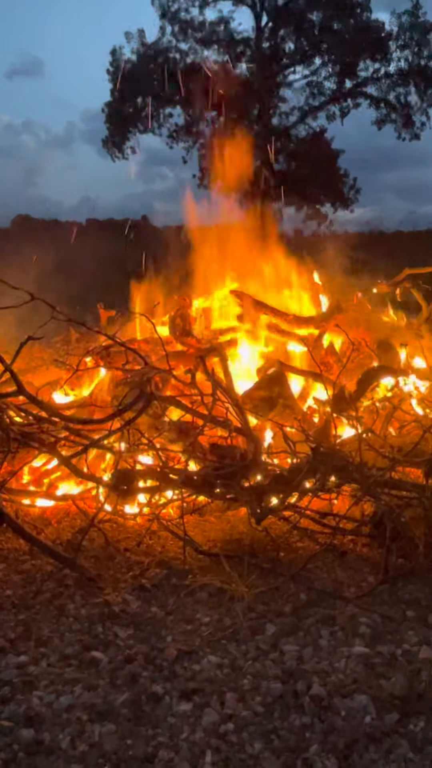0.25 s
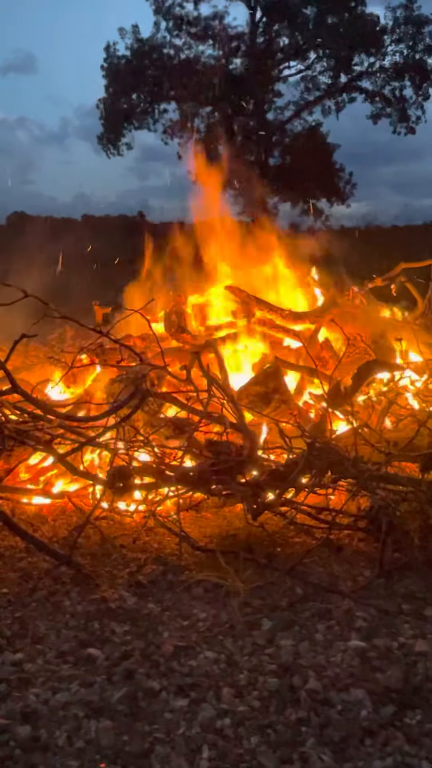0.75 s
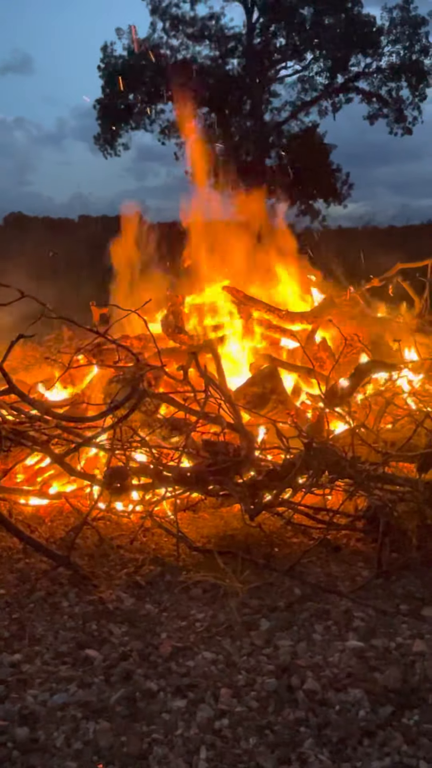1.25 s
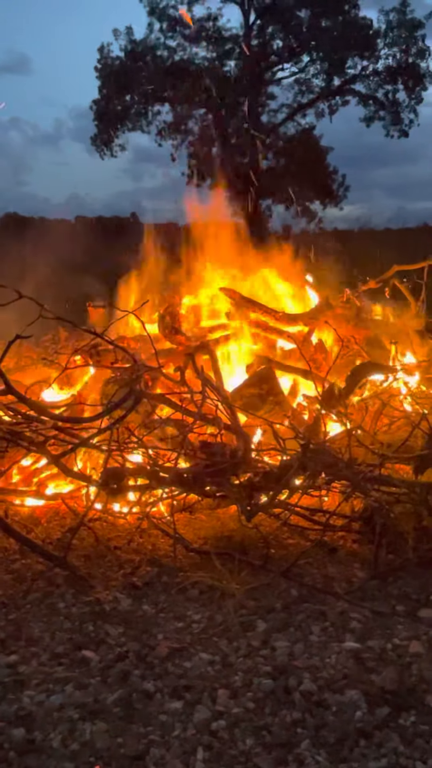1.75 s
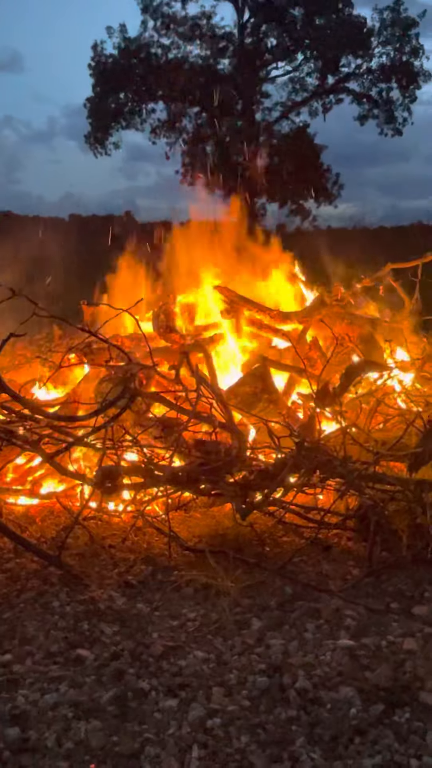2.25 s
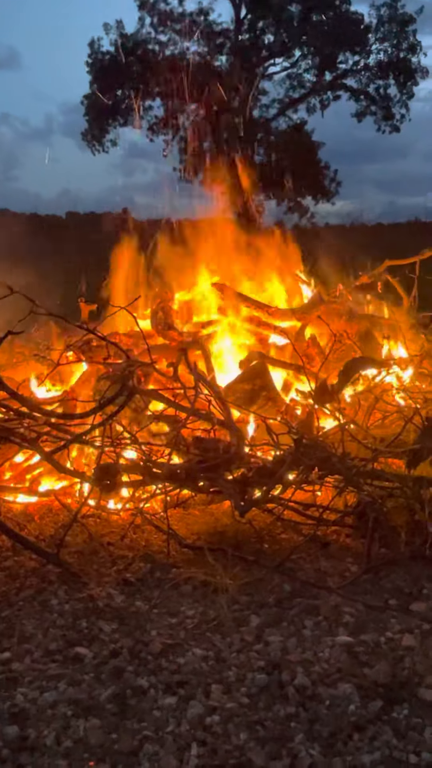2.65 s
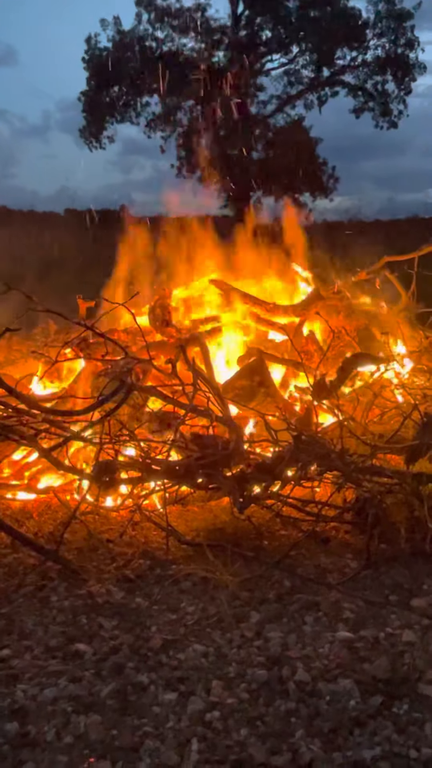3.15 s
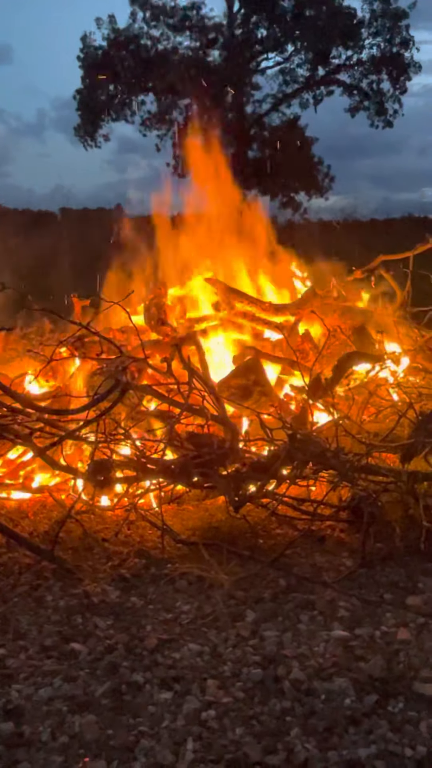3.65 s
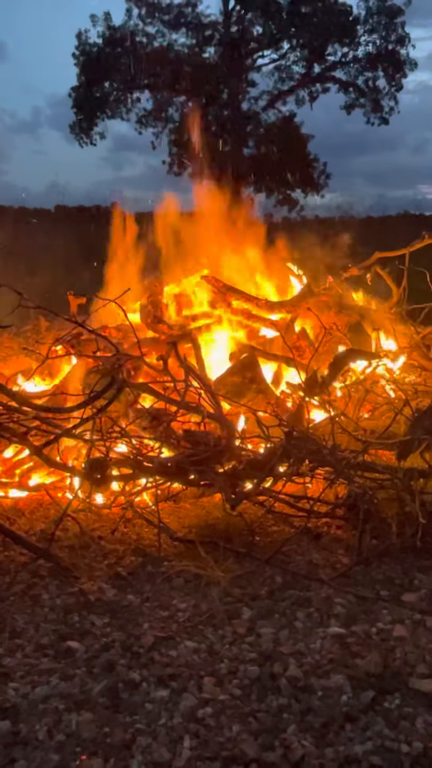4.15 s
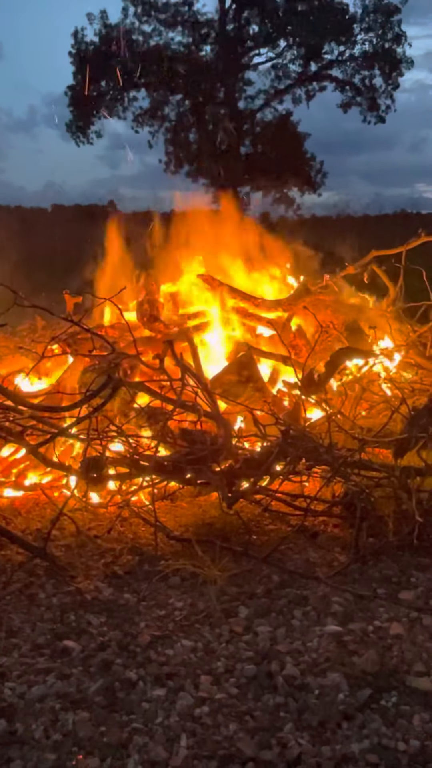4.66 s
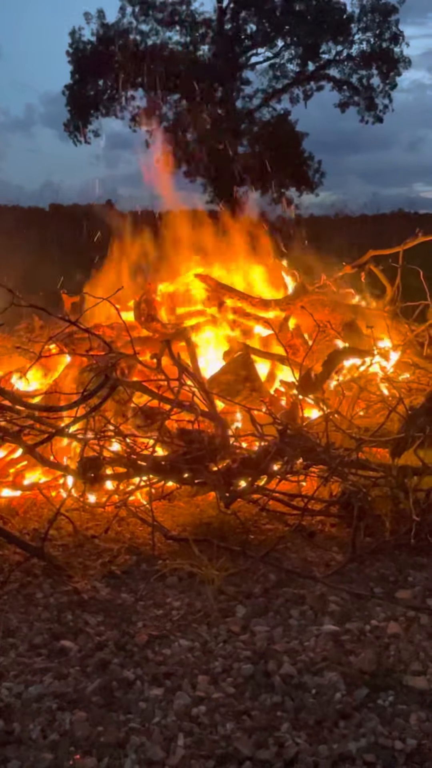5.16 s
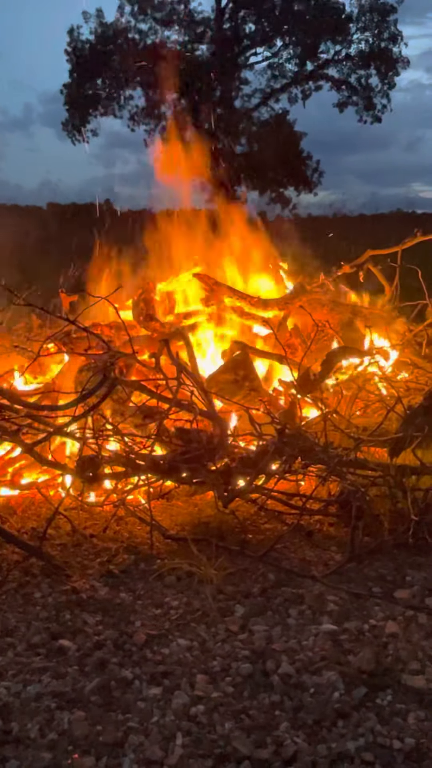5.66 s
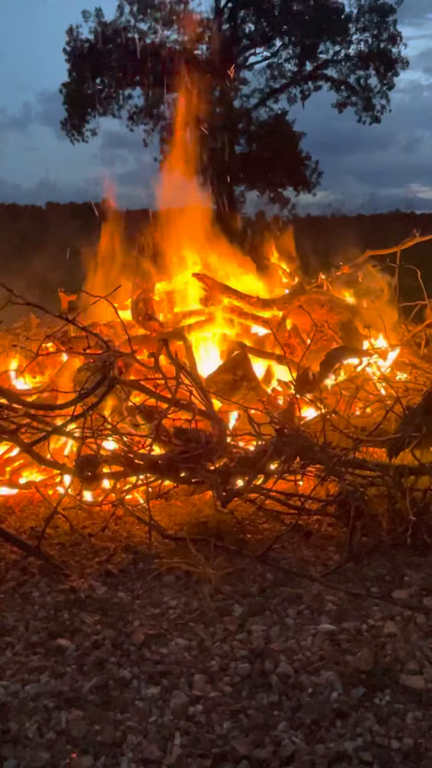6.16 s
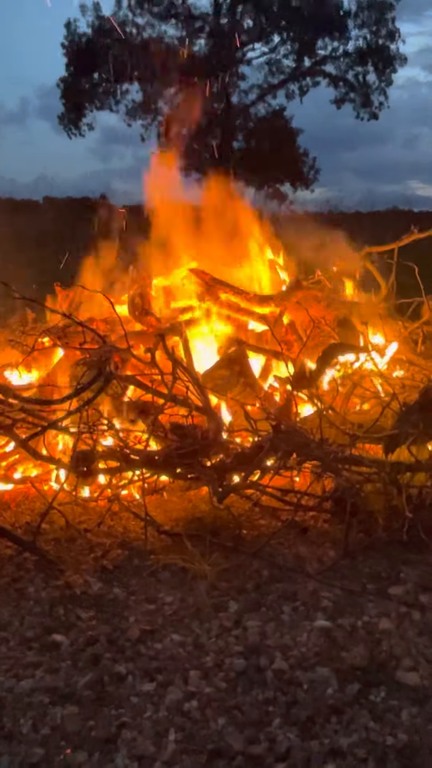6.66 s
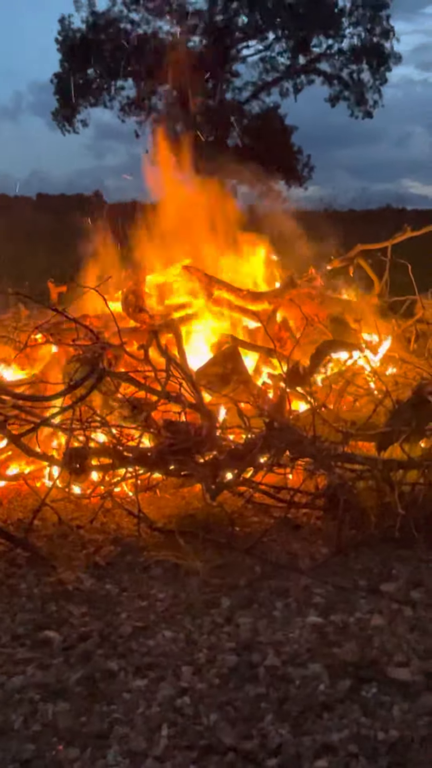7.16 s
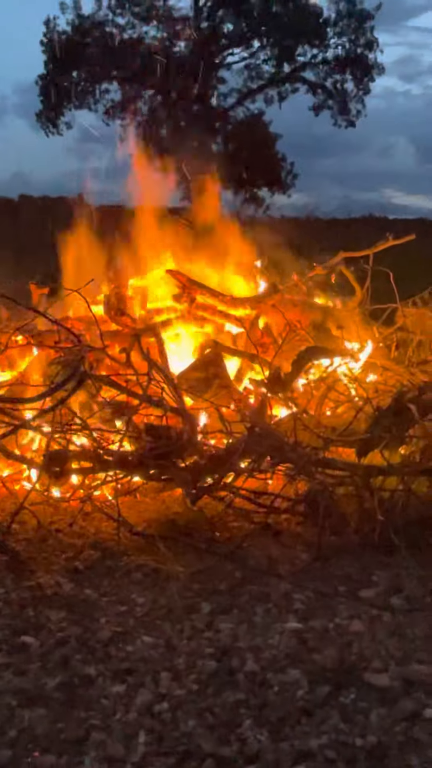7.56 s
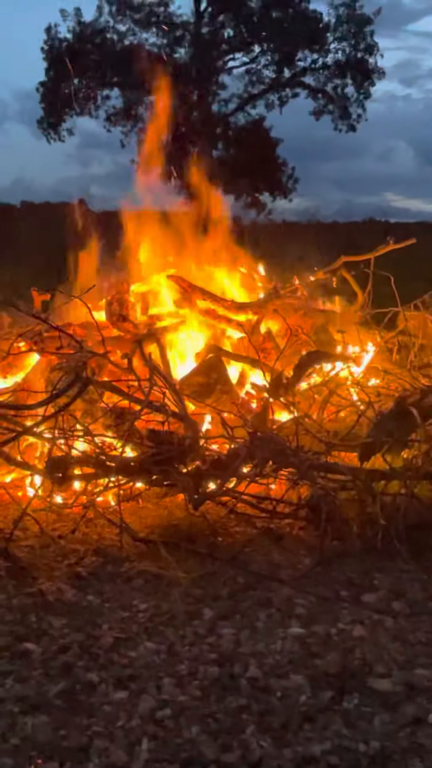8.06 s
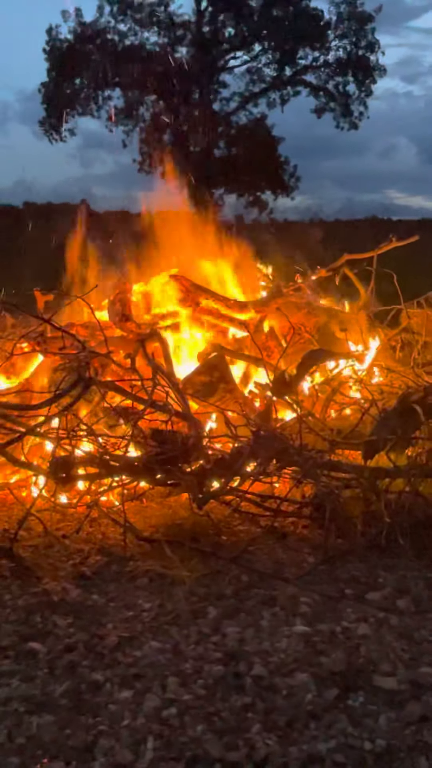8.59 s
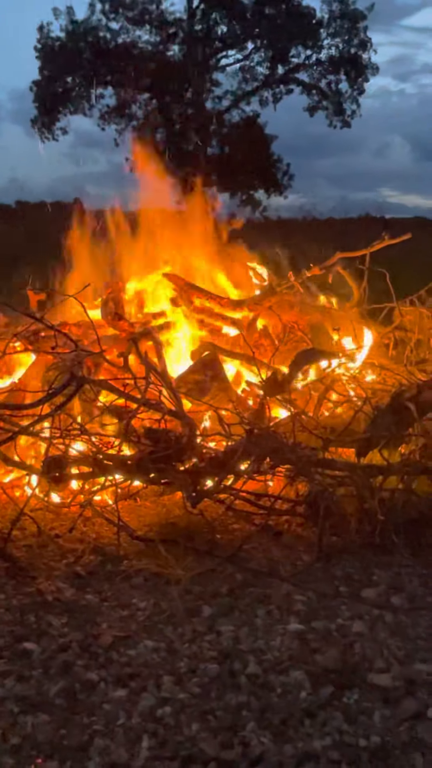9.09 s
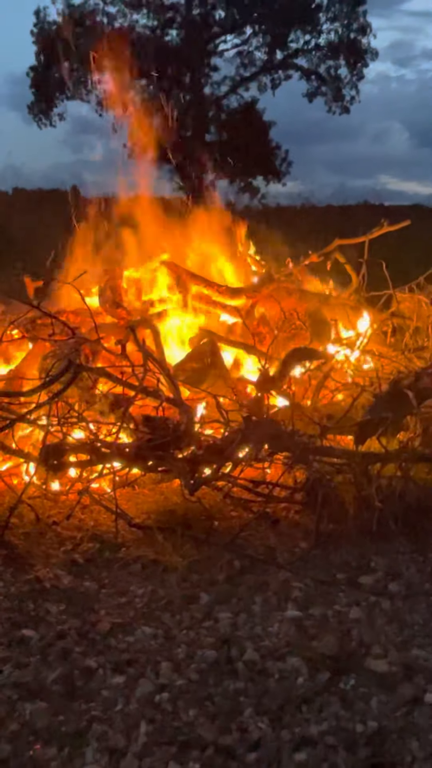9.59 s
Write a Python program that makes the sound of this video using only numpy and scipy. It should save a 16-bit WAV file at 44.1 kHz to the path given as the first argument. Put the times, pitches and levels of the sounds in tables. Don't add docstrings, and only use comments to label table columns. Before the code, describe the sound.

A large fire of logs and dry branches burns outdoors, heard close in stereo with a dry, open sound. A deep, soft flame roar runs throughout, with thin fluttering sizzle above it. From 0 to 2 s, small ticks and snaps scatter irregularly, with a clearer pop at 0.2. Around 2.1 to 2.6 s several pops cluster; the hiss flares near 2.9 while a cow lows very faintly far away, from 2.6 to 3.3. Pops at 3.2 and 4.3 lead into light crackle and a sparser stretch. At 6.2 s comes the loudest, sharp crack, then bright snaps near 6.9. Activity thickens from 8 s: a hard crack at 8.2, strong pops at 8.7, dull knocks around 9.2 and another sharp pop at 9.4, as the roar swells toward the end. Crickets trill faintly throughout, with intermittent three-pulse chirps about every half second between 1.7 and 6.5 s.

```python
import sys
import numpy as np
from scipy import signal
from scipy.fft import rfft, irfft, next_fast_len
from scipy.io import wavfile
from scipy.ndimage import uniform_filter1d

SR = 44100
rng = np.random.default_rng(int(sys.argv[2]) if len(sys.argv) > 2 else 0)


def store_pcm(level_fs):
    pcm = np.round(np.clip(level_fs, -1, 1) * 32767).astype(np.int16)
    wavfile.write(sys.argv[1], SR, np.atleast_2d(pcm).T)


def makeup_ratio(level_db):
    decades = np.asarray(level_db, float) / 20
    return 10 ** decades


N = 433503


def level(x, db):
    return x * makeup_ratio(db) / np.sqrt(np.mean(x ** 2))


def curve(table):
    s, *columns = np.transpose(table)
    return [np.interp(np.arange(N) / SR, s, column) for column in columns]


def colour(x, shape):
    hz, db = np.transpose(shape)
    size = next_fast_len(x.shape[-1])
    f = np.maximum(np.fft.rfftfreq(size, 1 / SR), 1)
    gain = makeup_ratio(np.interp(np.log(f), np.log(hz), db))
    return irfft(rfft(x, size) * gain, size)[..., :x.shape[-1]]


def walk(rate):
    hold = int(SR / rate)
    steps = np.repeat(rng.standard_normal(N // hold + 1), hold)
    return 1.19 * uniform_filter1d(uniform_filter1d(steps, hold), hold)[:N]


# frequency in Hz, lead in radians.
PORT_LEAD = [(20, 0), (3300, 0), (4500, 3.0), (5100, 1.0), (7700, 3.14), (11000, 6.28), (14400, 9.42),
             (15500, 10.3), (22050, 10.5)]


def ports(main, other, lo_hz, hi_hz, unlike):
    size = next_fast_len(N)
    f = np.fft.rfftfreq(size, 1 / SR)
    octaves_off = np.log(np.maximum(f, 1) ** 2 / (lo_hz * hi_hz)) / np.log(hi_hz / lo_hz)
    share = np.clip(unlike, 0, 1) * np.exp(-np.abs(octaves_off) ** 4)
    share = np.minimum(share + f / 3e5, 1)
    left, odd = rfft(main[0], size), rfft(other, size)
    right = rfft(main[1], size) * np.sqrt(1 - share) + odd * np.sqrt(share)
    turn = np.exp(.5j * np.interp(f, *np.transpose(PORT_LEAD)))
    return irfft(np.array([left * turn, right / turn]), size)[:, :N]


BURST_EDGES_HZ = [190, 1300, 4500, 9000, 16000]
# frequency in Hz, gain in dB.
BURST_TREBLE = [(20, 0), (1600, 2.5), (2500, 0), (3400, -4), (4600, 0), (9000, 0), (13000, -6), (15850, 0),
                (16150, -14), (17100, -24), (17300, -80)]


def bursts(rows, blast_s=0.00038, rattle_s=0.0051, rattle_db=-29, thump_s=0.0019, size=1024, count=96):
    s, crack_db, thump_db, snap_db, spit_db, crack_hz = np.transpose(rows)
    t = (np.arange(size) - count) / SR
    after = np.maximum(t, 0)
    chance = rng.standard_normal((len(s), 3, size + 3))
    noise = chance[:, :2, :size]
    pan_db = 1.4 * chance[:, 2, -1]
    vary = np.exp(0.404 * chance[:, :1, -3:])

    edge = .1 * np.exp(-np.abs(t) / (blast_s * vary[..., :1] * np.where(t < 0, .9, 1)))
    echoes = makeup_ratio(1.7 * uniform_filter1d(chance[:, 2:, :size], size=24) * np.sqrt(24))
    rattle = makeup_ratio(rattle_db) * np.exp(-after / rattle_s) * np.minimum(after / 0.0012, 1) * echoes
    blast = noise * (edge + rattle) + .65 * (t == 0)
    ragged = blast + 2.5 * edge * noise

    cycles = 300 * after + 1300 * 0.000963 * (1 - np.exp(-after / 0.00077))
    deep = makeup_ratio(.5 * np.clip(thump_db + 7.5, 0, 18))[:, None, None]
    thump = np.sin(2 * np.pi * cycles * vary[..., 1:2] / np.sqrt(deep))
    thump = thump * np.exp(-after / (thump_s * deep * vary[..., 2:])) + .5 * blast

    f = np.maximum(np.fft.rfftfreq(size, 1 / SR), 1)
    sides = np.array([[.5], [-.5], [-.5]])
    layers = ((thump, thump_db, 3.5), (blast, 0, pan_db), (ragged, snap_db, 0), (ragged, spit_db, 0))
    shapes = 0
    for k, (source, db, pan) in enumerate(layers):
        lo_hz, hi_hz = BURST_EDGES_HZ[k:k + 2]
        band = 1 / np.sqrt((1 + (lo_hz / f) ** 10) * (1 + (f / hi_hz) ** 10))
        if k == 1:
            band = band * (.3 + np.exp(-np.log(f / crack_hz[:, None, None]) ** 2 / .1))
        part = irfft(rfft(source) * band, size)
        energy = np.sum(part[..., :count + 200] ** 2, axis=-1, keepdims=True) / 240
        gain = makeup_ratio(crack_db + db + pan * sides).T[..., None]
        shapes = shapes + (part / np.sqrt(energy))[:, [0, 0, 1]] * gain

    out = np.zeros((3, N + size))
    for start, shape in zip((s * SR).astype(int) + 12, colour(shapes, BURST_TREBLE)):
        out[:, start:start + size] += shape
    out = out[:, count:N + count]
    return ports(out[:2], out[2], 3100, 5200, .45)


def ticks(s, crack_db, treble_db):
    thump, tilt = rng.standard_normal((len(s), 2)).T
    thump_db = -9 + 4 * thump
    snap_db, spit_db = treble_db - 1.5 + 5.6 * tilt, treble_db - 2 - 6.0 * tilt
    return np.transpose([s, crack_db, thump_db, snap_db, spit_db])


# start in seconds, end in seconds.
FLURRY_TIMES = [(.48, .54), (.65, .74), (.85, .89), (1.03, 1.19), (1.53, 1.66), (1.75, 1.78), (1.92, 1.98),
                (2.38, 2.52), (2.63, 2.8), (2.91, 3.08), (3.8, 3.91), (4.19, 4.36), (4.64, 4.66),
                (4.93, 5.12), (5.45, 5.53), (5.71, 5.76), (6.33, 6.44), (6.7, 6.71), (7.0, 7.09),
                (7.34, 7.54), (7.79, 7.88), (8.23, 8.27), (8.34, 8.53), (8.63, 8.71), (8.84, 9.12),
                (9.24, 9.34)]


def crackle(count=150, lull_share=.12):
    t = np.arange(N) / SR
    in_flurry = sum((t > start) & (t < end) for start, end in FLURRY_TIMES)
    busy = np.cumsum(lull_share + in_flurry)
    when, size, bright = rng.random((count, 3)).T
    s = np.interp((np.arange(count) + when) / count, busy / busy[-1], t)
    bright_db = 8.5 + 22 * (bright - .5)
    treble_db = -51.5 - 1.5 * np.log(size + 0.06)
    return ticks(s, treble_db - np.maximum(bright_db, 1), bright_db)


# start in seconds, crack level in dB,
# then thump, snap and spit in dB relative to the crack.
LOG_POPS = [(0.2254, -36.5, -8.5, 4, -21), (2.1581, -38.5, -17, 4.5, -13), (2.2021, -40.5, -7.5, -4, -17),
            (2.4328, -43, 1.5, 2, 5), (3.212, -40, -4.5, 4.5, -12), (4.3363, -34.5, -19, -13, -26),
            (4.8053, -42.5, -12, 11.5, -10), (6.1907, -19.5, -9, -4, -34), (6.3591, -39, 2, -8, -7),
            (7.7741, -42, -16, -1, -15), (7.9908, -32.5, -12.5, -0.5, 10), (8.1939, -23, -3.5, -14, -9),
            (8.2173, -35.5, -7, 4, 14), (8.6828, -32.5, -11.5, 4.5, -2), (8.7339, -27.5, -7, -3, 6),
            (9.3929, -28.5, -10.5, 5.5, -31)]
# start in seconds, crack level in dB,
# then thump, snap and spit in dB relative to the crack.
LIMB_POPS = [
    (0.9337, -36, -18, 4, -32),
    (1.4615, -39, -31, -1, 2.5),
    (2.0707, -40.5, -22, 1, -17),
    (2.0856, -33.5, -23, 5.5, -17),
    (2.2327, -41, -11, 8, -26),
    (2.6214, -33, -15.5, 6.5, -2),
    (6.9469, -44.5, -24, 14.5, 13),
    (9.1849, -40, -14, 3.5, -6),
    (9.5163, -41, -14.5, 3.5, 3.5),
    (9.8097, -42, -14, 2, -29),
]
# start in seconds, crack level in dB,
# then snap and spit in dB relative to the crack.
BRANCH_SNAPS = [(0.0968, -44.5, 7.5, -12), (0.2707, -47.5, 7.5, 8), (0.377, -51, 9.5, -6),
                (0.9674, -43, 5, -13), (1.9568, -51, 4.5, -5), (4.845, -54, 6, 7), (2.3559, -52.5, 12, 9),
                (2.8327, -45.5, 7.5, 2), (3.0166, -58, 22, 17), (4.4234, -48, 0, 0), (4.5988, -51, 9.5, 10),
                (4.7139, -50.5, 10, 15), (4.7265, -50.5, 8, 7), (4.7701, -48.5, 7, -4),
                (5.3539, -47.5, -2, 6), (6.7812, -46, 3, -18), (6.8211, -48, 8, 8), (6.9602, -46, 1, -4),
                (7.3676, -47.5, -6, 5), (7.6212, -53, 6.5, 12), (7.8067, -57, 5, 11),
                (8.1744, -42.5, -4, 9.5), (8.5839, -42.5, 0, 2.5), (8.6644, -42.5, 0, 7),
                (8.7847, -47.5, 5.5, -1), (9.136, -51.5, 9, 7), (9.1556, -47.5, 8.5, 8),
                (9.2302, -54.5, 12, 14), (9.4934, -49, 9, -11), (9.6774, -51.5, 14, 3)]
# start in seconds, crack level in dB,
# thump in dB relative to the crack.
WOOD_THUDS = [
    (0.7454, -47, -4.5),
    (2.3021, -65.5, 19.5),
    (5.597, -60.5, 12),
    (7.1036, -43.5, -10),
    (8.292, -50, 2.5),
    (8.8562, -45, -1.5),
    (9.2154, -39.5, -8),
]
# start in seconds, crack level in dB, treble in dB relative to the crack.
TWIG_KNOCKS = [(0.171, -51, 0), (0.2337, -52, -13), (0.4409, -54.5, 4), (0.964, -60, -12), (1.4556, -48, 5),
               (1.788, -47.5, -5), (2.0179, -45.5, -23), (2.8286, -57, 2), (3.1775, -48, 0),
               (4.3874, -52.5, 4.5), (5.0522, -56, -2), (5.0769, -47.5, -7), (5.376, -51, 1),
               (5.5058, -53, -11), (5.7237, -47.5, 3.5), (6.182, -50, -1), (6.999, -48, -10),
               (7.2138, -51, -18), (7.7038, -51.5, -5), (7.8747, -51, 0.5), (8.064, -50, -17),
               (8.2576, -49.5, -10), (8.4753, -50, 7), (8.7206, -49, -9), (8.8157, -44.5, -10),
               (9.1772, -47, 2), (9.4895, -49.5, 6), (9.5815, -49, 4.5), (9.694, -50.5, -11),
               (9.7467, -42.5, -2.5)]
# start in seconds, crack level in dB, treble in dB relative to the crack.
BARK_SPITS = [(0.488, -53.5, 12.5), (0.6798, -55, 10.5), (1.3018, -59, 13), (1.4649, -58.5, 15),
              (2.2149, -50.5, 5), (2.5706, -69, 23.5), (2.7456, -56, 10), (2.8525, -53, 10),
              (2.9369, -60, 10), (2.993, -63, 15), (3.2543, -54, 8), (4.2673, -60, 11), (5.0373, -52.5, 8),
              (5.1016, -55.5, 8.5), (5.9563, -62.5, 19), (6.276, -54.5, 9), (6.2879, -47.5, 4),
              (6.8148, -51, 7.5), (6.8276, -51, 6), (6.9435, -47.5, 9), (6.9798, -57, 13.5),
              (7.0197, -50, 4), (8.0238, -64, 14), (8.0377, -60.5, 15), (8.2119, -42.5, 2),
              (8.4475, -55.5, 12), (8.7379, -40.5, 11), (8.746, -49, 3), (8.935, -64, 22),
              (9.324, -58, 14.5)]


def pockets():
    snaps = np.insert(BRANCH_SNAPS, 2, -12, axis=1)
    s, crack_db, thump_db = np.transpose(WOOD_THUDS)
    dull_db = np.full(len(s), -5.0)
    thuds = np.transpose([s, crack_db, thump_db, dull_db, dull_db])
    twigs = ticks(*np.transpose(np.vstack([TWIG_KNOCKS, BARK_SPITS])))
    small = np.vstack([snaps, thuds, twigs, crackle()])
    small_hz = 2690 * np.exp(0.33 * rng.standard_normal(len(small)))
    crack_hz = np.r_[[2305] * len(LOG_POPS), [3480] * len(LIMB_POPS), small_hz]
    return np.column_stack([np.vstack([LOG_POPS, LIMB_POPS, small]), crack_hz])


# frequency in Hz, density in dB per Hz.
SIZZLE_COLOUR = [(500, -34), (1200, -6), (2500, 6), (4500, 4), (6000, 3), (9000, -3.5), (10700, 5),
                 (13000, -3.5), (15800, 5), (16150, -50)]


def sizzle(db):
    tail = np.exp(-np.arange(300) / 45)
    sizes = makeup_ratio(np.minimum(5.15 * rng.exponential(size=N), 16))
    grains = (rng.random(N) < 500 / SR) * sizes
    cracks = signal.fftconvolve(grains, tail)[:N]
    swell = np.sqrt(1 + (0.78 * cracks) ** 2) * makeup_ratio(db + walk(17))
    main, other = colour(rng.standard_normal((2, N)) * swell, SIZZLE_COLOUR)
    return ports([main, main], other, 2540, 8100, 1.0)


# frequency in Hz, density in dB per Hz.
ROAR_COLOUR = [(13, -62), (22, -34), (40, -5), (70, 1), (170, -9), (233, -15), (452, -23), (630, -31),
               (861, -33.5), (1050, -35), (1800, -37.5), (2340, -104), (3960, -120)]


def roar(db):
    main, other = colour(rng.standard_normal((2, N)), ROAR_COLOUR)
    gain = makeup_ratio(db + 2 + 0.58 * walk(5.6)) / np.std(main)
    left, right = main + 0.039 * other, main - 0.056 * other
    return ports([left * gain, right * gain], other * gain, 330, 2100, 0.75)


# carrier in Hz, pulses a second, level in dB, left minus right in dB,
# left lead in radians.
TRILL_CHORUS = [
    (2767, 90, -63.5, 0, 0.92),
    (3760, 40, -65, -3, 0.44),
    (4420, 28, -68, 6, 3.3),
    (5500, 39, -70.5, -7, 1.7),
]


def trills(blur_hz=260):
    t, out = np.arange(N) / SR, 0
    side = np.array([[.5], [-.5]])
    smear = signal.butter(2, blur_hz / 2, fs=SR, output="sos")
    for hz, rate, db, pan_db, lead in TRILL_CHORUS:
        gate = .7 + .4 * np.sin(2 * np.pi * rate * t + 1.5 * walk(2))
        near, far = signal.sosfilt(smear, rng.standard_normal((2, 2, N)) * np.sqrt(SR / blur_hz))
        singers = near + 1j * far
        swell = makeup_ratio(2 * walk(1.2))
        tone = np.imag(singers * np.exp(2j * np.pi * hz * t) * np.exp(1j * lead * side))
        out = out + level(gate * swell * tone, db) * makeup_ratio(pan_db * side)
    return out


# time of the last of three pulses in seconds, level in dB.
CRICKET_CHIRPS = [(0.379, -51.5), (1.744, -51), (2.318, -53), (2.81, -51.5), (3.299, -52), (3.784, -54.5),
                  (4.316, -52.5), (4.903, -57), (5.412, -53), (6.006, -56), (6.49, -53.5), (7.44, -52),
                  (9.784, -53)]


def chirps(gap_s=0.041, pulse_s=0.0277):
    t = np.arange(int(pulse_s * SR)) / SR
    phase = 2 * np.pi * (4450 * t - 2800 * t ** 2)
    stroke = np.sin(phase + np.array([[0], [-1.5]])) * np.sin(np.pi * t / pulse_s)
    out = np.zeros((2, N + len(t)))
    for s, db in CRICKET_CHIRPS:
        for k, grow_db in enumerate((3.5, 1.5, -4)):
            start = int((s - k * gap_s - pulse_s / 2) * SR)
            rasp = np.interp(t, np.linspace(0, pulse_s, 9), makeup_ratio(3 * rng.standard_normal(9)))
            out[:, start:start + len(t)] += stroke * makeup_ratio(db + grow_db) * rasp
    return out[:, :N]


# time in seconds, pitch in Hz, level in dB.
COW_CALL = [
    (2.58, 181, -110),
    (2.64, 186, -76),
    (2.83, 195, -67),
    (3.0, 198.5, -65),
    (3.13, 197.5, -67),
    (3.27, 189, -74),
    (3.36, 183, -110),
]
# multiple of the pitch, level in dB.
THROAT = [(4, -9), (5, -5), (6, 1.5), (7, -6), (8, -12)]


def cow():
    hz, db = curve(COW_CALL)
    hz = uniform_filter1d(hz, size=5000)
    phase = 2 * np.pi * np.cumsum(hz * (1 + 0.0019 * walk(30))) / SR
    on = db > -110
    flutter_db = 2.0 * uniform_filter1d(rng.standard_normal((5, on.sum())), size=2500) * 50
    voice = np.zeros(N)
    for (k, harmonic_db), wobble_db in zip(THROAT, flutter_db):
        voice[on] += makeup_ratio(harmonic_db + wobble_db) * np.sin(k * phase[on])
    voice[on] *= makeup_ratio(db[on] + 3)
    return voice * makeup_ratio(np.array([[1.5], [-1.5]]))


# time in seconds, roar level in dB, sizzle level in dB.
FIRE_LEVELS = [
    (0.0, -48.5, -61),
    (2.08, -47, -60.5),
    (2.49, -46.5, -62),
    (2.93, -46.5, -58.5),
    (3.31, -47.5, -62),
    (7.2, -47, -59.5),
    (8.43, -46, -59.5),
    (9.09, -47.5, -60),
    (9.83, -45.5, -61),
]


def scene():
    roar_db, sizzle_db = curve(FIRE_LEVELS)
    fire = bursts(pockets()) + sizzle(sizzle_db) + roar(roar_db)
    return fire + trills() + chirps() + cow()


def band_limit(x):
    return signal.sosfilt(signal.butter(12, 17150, fs=SR, output="sos"), x)


def record(dry):
    return band_limit(dry)


dry = scene()
out = record(dry)
store_pcm(out)
```